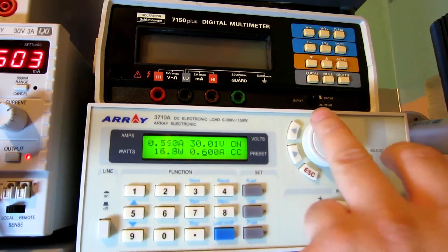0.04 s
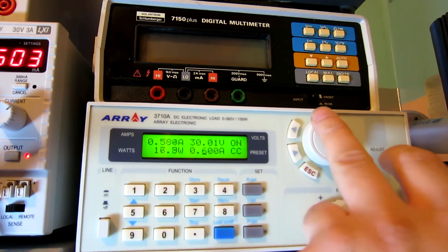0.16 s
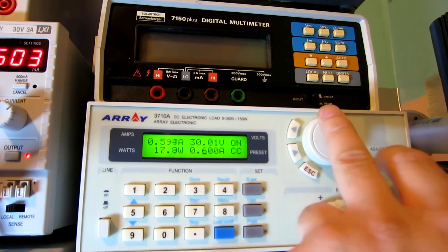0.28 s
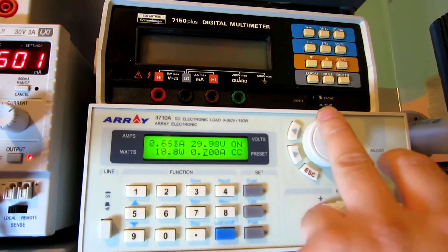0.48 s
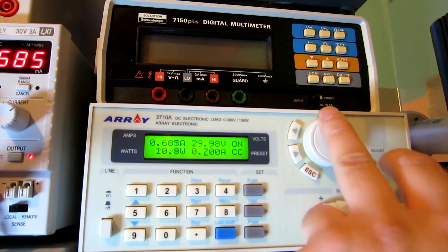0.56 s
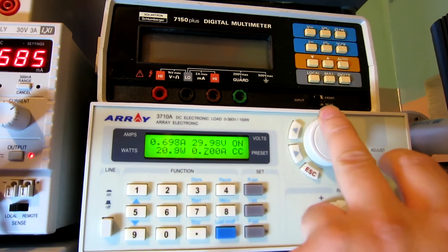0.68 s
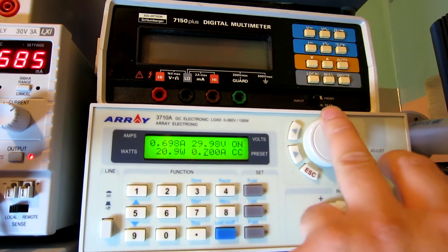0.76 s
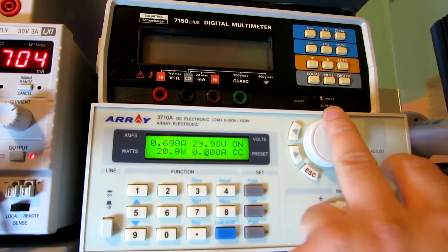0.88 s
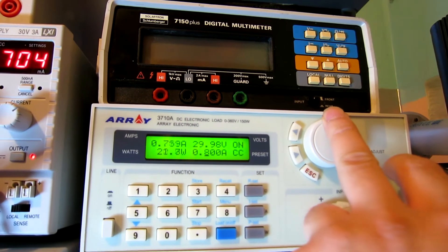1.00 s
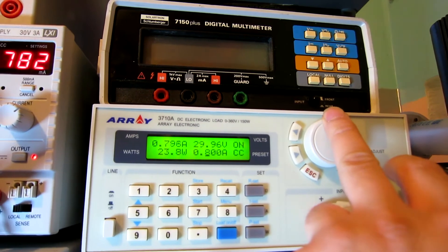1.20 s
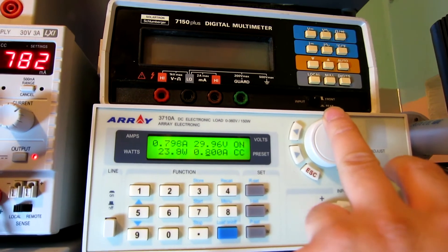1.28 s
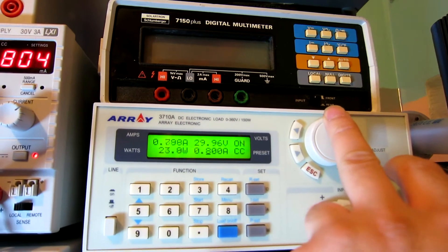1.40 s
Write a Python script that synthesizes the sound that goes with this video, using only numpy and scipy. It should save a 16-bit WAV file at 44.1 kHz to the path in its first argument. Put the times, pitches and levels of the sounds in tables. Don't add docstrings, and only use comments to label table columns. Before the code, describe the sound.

A plastic knob on a bench instrument is turned two steps, each a bright springy snap followed by a small hollow case knock; soft fan noise and thin mains buzz continue, heard very close in a small room.

```python
import sys
import numpy as np
from scipy import signal
from scipy.fft import rfft, irfft
from scipy.io import wavfile
from scipy.ndimage import uniform_filter1d, map_coordinates

SR = 44100
rng = np.random.default_rng(int(sys.argv[2]) if len(sys.argv) > 2 else 0)


def dump(signal):
    limited = np.clip(np.atleast_2d(signal).T, -1, 1)
    pcm = np.round(limited * 32767).astype(np.int16)
    wavfile.write(sys.argv[1], SR, pcm)


def nominal_scale(level):
    x = np.asarray(level, float) / 20
    return 10 ** x


N = 63945
SNAP_RISE_S = 0.00018


def evened(x):
    return x / np.sqrt(np.mean(x ** 2) + 1e-20)


def read(points, hz):
    point_hz, value = np.transpose(points)
    return np.interp(np.log(hz + 1), np.log(point_hz + 1), value)


def add(mix, start_s, sound):
    part = mix[round(start_s * SR):][:len(sound)]
    part += sound[:len(part)]


# frequency_hz, density_db (per Hz)
FAN_NOISE = [(22, -23), (60, -10), (151, -3), (373, -7), (1180, -13.5), (5090, -28), (10400, -32),
             (15700, -49)]
# centre_hz, width_hz, level_db
FAN_RESONANCES = [(45.6, 10, -65), (91.7, 8.7, -57), (144, 10, -61), (197.9, 3.5, -56.5), (341.6, 17, -62),
                  (1198.5, 37, -62.5)]


def fans():
    level_db, patchiness_db = -46, 0.7
    frames, hz = N // 256 + 5, np.fft.rfftfreq(1024, 1 / SR)
    real, imaginary, patches = rng.standard_normal((frames, 513, 3)).T
    patches = uniform_filter1d(patches, size=12, axis=0)
    patches = evened(uniform_filter1d(patches, size=12, axis=1))
    gain_db = read(FAN_NOISE, hz)[:, None] + patchiness_db * patches
    z = (real + 1j * imaginary) * nominal_scale(gain_db)
    hiss = signal.istft(z, nperseg=1024, noverlap=768)[1][:N]
    out = nominal_scale(level_db) * evened(hiss)
    hz = np.fft.rfftfreq(N, 1 / SR)
    for centre_hz, width_hz, tone_db in FAN_RESONANCES:
        response = 1 / (1 + (2 * (hz - centre_hz) / width_hz) ** 2)
        tone = irfft(rfft(rng.standard_normal(N)) * response, N)
        out = out + nominal_scale(tone_db) * evened(tone)
    return out


# frequency_hz, level_db
BUZZ_ENVELOPE = [(2000, -95), (4500, -85), (5800, -83), (7500, -86), (8800, -82), (9900, -87), (10450, -93),
                 (10900, -79)]
# frequency_hz, level_db (rms)
STRONG_HARMONICS = [(5599, -73), (5701, -75), (6799, -78), (8403, -79), (9550, -80), (9701, -76),
                    (10051, -76), (10099, -70), (10201, -78), (10298, -76), (10600, -77), (10799, -75),
                    (10853, -77), (11999, -83)]


def buzz():
    mains_hz, spread_db, odd_db = 50.003, 4, -6
    fall_db_per_octave, strong_gain_db = -65, 1.5
    k, t = np.arange(40, 290), np.arange(N) / SR
    hz = k * mains_hz
    draw = rng.random((len(k), 2))
    db = read(BUZZ_ENVELOPE, hz) + odd_db * (k % 2)
    octaves_above = np.log2(np.maximum(hz / BUZZ_ENVELOPE[-1][0], 1))
    db = db + fall_db_per_octave * octaves_above
    db = db + spread_db * 2 * (2 * draw[:, 0] - 1)
    for line_hz, line_db in STRONG_HARMONICS:
        db[k == round(line_hz / mains_hz)] = line_db + strong_gain_db
    cycle = np.arange(4096) / 4096
    phases = k[:, None] * cycle + draw[:, 1:]
    shape = (np.sqrt(2) * nominal_scale(db)) @ np.sin(2 * np.pi * phases)
    return map_coordinates(shape, [t * mains_hz % 1 * len(cycle)], order=3, mode="grid-wrap")


def ring(hz, db, t60_s, rise_s, sign=1):
    t = np.arange(SR // 5)[:, None] / SR
    polarity = sign ** np.arange(len(hz))
    decay = nominal_scale(db - 60 * t / np.maximum(t60_s, 0.003))
    rise = 1 - np.exp(-t / rise_s)
    return (polarity * decay * np.sin(2 * np.pi * hz * t) * rise).sum(1)


# frequency_hz, first_step_db, second_step_db, t60_s
KNOB_MODES = [(1830, -54, -28, 0.024), (2750, -27, -28, .015), (3380, -18.5, -31, 0.042),
              (3780, -22, -17.5, 0.017), (4898, -2.5, -1.5, 0.015), (5030, -12, -14.5, 0.04),
              (5270, -30, -13, 0.017), (5770, -26, -23, 0.0077), (6490, -32, -43, 0.0085),
              (7430, -13, -13.5, .015), (8460, -21, -10, 0.017)]


def knob_ring(step, level_db):
    modes = np.array(KNOB_MODES)
    return ring(modes[:, 0], level_db + modes[:, 1 + step], modes[:, 3], SNAP_RISE_S)


# frequency_hz, first_step_db, second_step_db
SPRING_MODES = [(10300, -19, -15), (11040, 3, -11.5), (11830, 3.5, -5.5), (12770, -9, -5),
                (14080, -17, -17.5)]


def spring_ring(step, level_db):
    modes = np.array(SPRING_MODES)
    return ring(modes[:, 0], level_db + modes[:, 1 + step], 0.011, SNAP_RISE_S, -0.99)


# frequency_hz, t60_s
BENCH_DECAY = [(400, 0.047), (1500, 0.072), (4500, 0.096), (9000, 0.14), (13000, 0.027)]


def bench(x):
    rise_s = 0.002
    taps = rng.choice([-1., 1.], SR // 4) * (rng.random(SR // 4) < 0.15)
    hz, t, z = signal.stft(taps, SR, nperseg=128)
    decay_db = -60 * t / read(BENCH_DECAY, hz)[:, None]
    tail = signal.istft(z * nominal_scale(decay_db), SR, nperseg=128)[1]
    tail = tail * (1 - np.exp(-np.arange(len(tail)) / SR / rise_s))
    return signal.fftconvolve(x, tail / np.linalg.norm(tail))[:N]


# frequency_hz, density_db (per Hz)
RATTLE_SPECTRUM = [(1000, -50), (2500, -5), (4300, 9), (6300, -4), (8500, 2), (12500, -6), (14500, -12),
                   (16000, -43)]
# frequency_hz, t60_s
RATTLE_DECAY = [(1500, .09), (4300, .08), (8000, .1), (13000, .16)]


def rattle(level_db, tilt_db):
    crack_db, crack_s = 7, 0.0054
    hz, t, z = signal.stft(rng.standard_normal(SR // 5), SR, nperseg=64)
    db = read(RATTLE_SPECTRUM, hz) + tilt_db * np.log2((hz + 500) / 6000)
    decay_db = -60 * t / read(RATTLE_DECAY, hz)[:, None]
    ringing = signal.istft(z * nominal_scale(db[:, None] + decay_db), SR, nperseg=64)[1]
    t = np.arange(len(ringing)) / SR
    crack = 1 + nominal_scale(crack_db) * np.exp(-t / crack_s)
    return nominal_scale(level_db) * ringing * crack * (1 - np.exp(-t / SNAP_RISE_S))


# start_s, ring_db, rattle_db, tilt_db (rattle brightness per octave)
SNAP_EVENTS = [
    (.21978, -10.5, -29, -1.5),
    (.75842, -8.5, -31, 0.5),
]


def snaps():
    out = np.zeros(N)
    for step, (start_s, level_db, rattle_db, tilt_db) in enumerate(SNAP_EVENTS):
        snap = knob_ring(step, level_db) + spring_ring(step, level_db)
        add(out, start_s, snap)
        add(out, start_s, nominal_scale(-17) * bench(snap))
        add(out, start_s, rattle(rattle_db, tilt_db))
    return out


# frequency_hz, level_db, t60_s
CASE_MODES = [(377.6, -5, 0.043), (440, -1, 0.033), (515.6, -4, 0.034), (856, -4.5, .025),
              (1000, -2, 0.018), (1220.5, -1.5, 0.047), (1500, -4.5, 0.027), (1916, -4.5, .025),
              (2500, -9.5, 0.025), (3183, -6, 0.038), (3426, -4.5, 0.048), (3790, -5, 0.033)]
# start_s, level_db, centre_hz
KNOCK_EVENTS = [
    (.2225, -35, 2500),
    (0.2257, -25, 1500),
    (.2300, -30, 450),
    (.2390, -33, 1000),
    (0.2416, -34.5, 450),
    (.7650, -29.5, 2400),
    (0.7665, -33.5, 750),
    (0.7744, -29, 690),
    (.784, -38.5, 500),
    (.790, -40, 450),
]


def knocks():
    rise_s, slope_db = 0.00032, -5
    out = np.zeros(N)
    hz, db, t60_s = np.transpose(CASE_MODES)
    for start_s, level_db, centre_hz in KNOCK_EVENTS:
        weight_db = slope_db * np.log2(hz / centre_hz) ** 2
        detuned_hz = hz * rng.uniform(0.97, 1.02, len(hz))
        knock = ring(detuned_hz, level_db + db + weight_db, t60_s, rise_s)
        add(out, start_s, knock)
        add(out, start_s, nominal_scale(-9) * bench(knock))
    return out


def scene():
    return (fans() + buzz() + snaps() + knocks())[None]


def low_pass(x):
    return signal.sosfilt(signal.butter(12, 16540, fs=SR, output="sos"), x)


def record(dry):
    knee_db, slope, recover_db_per_s, grab_s = -19, 0.57, 3.5, 0.016
    low_hz, edge_hz = 38, 15750
    power_db = 10 * np.log10(abs(uniform_filter1d(dry[0] ** 2, size=88)) + 1e-12)
    fall_db = np.arange(N) * recover_db_per_s / slope / SR
    held_db = np.maximum.accumulate(power_db + fall_db) - fall_db
    over_db = np.maximum(held_db - knee_db, 0)
    r = np.exp(-1 / (grab_s * SR))
    ducked = dry / nominal_scale(slope * signal.lfilter([1 - r], [1, -r], over_db))
    hz = np.fft.rfftfreq(N, 1 / SR)
    band = (hz < edge_hz) / np.sqrt(1 + (low_hz / (hz + 1)) ** 8)
    finished = irfft(rfft(ducked) * band, N)
    return low_pass(finished)


dry = scene()
out = record(dry)
dump(out)
```